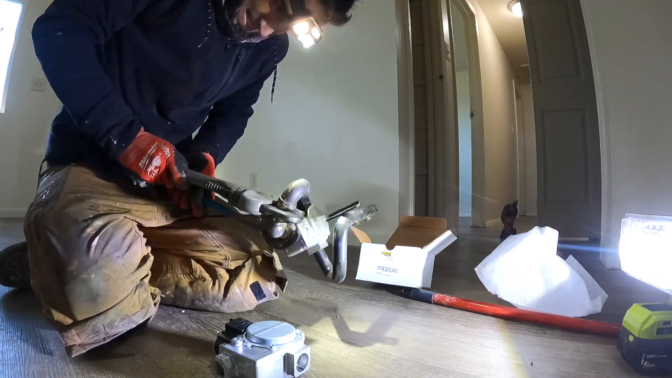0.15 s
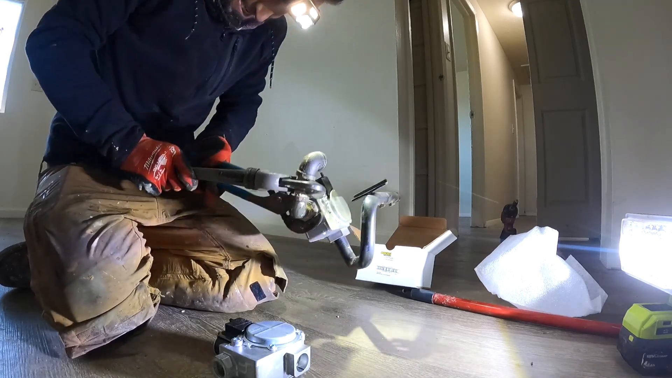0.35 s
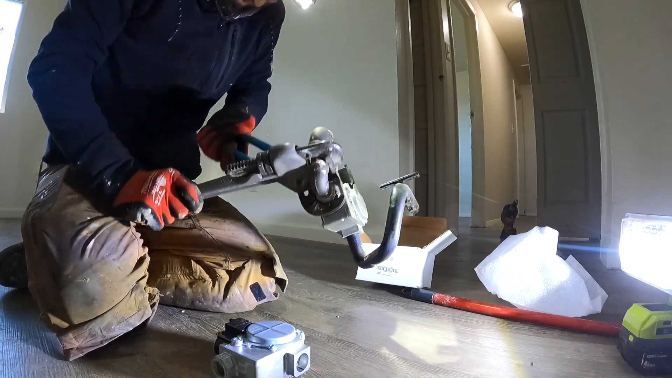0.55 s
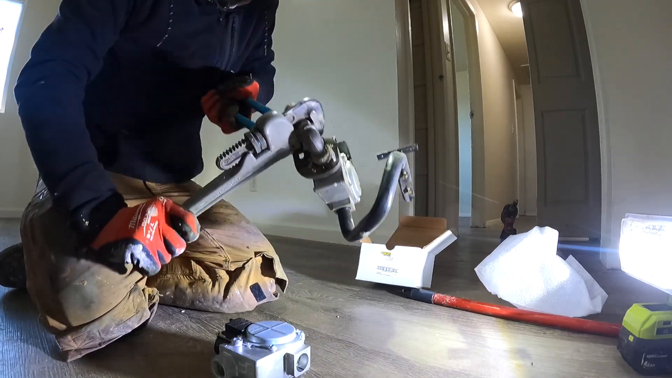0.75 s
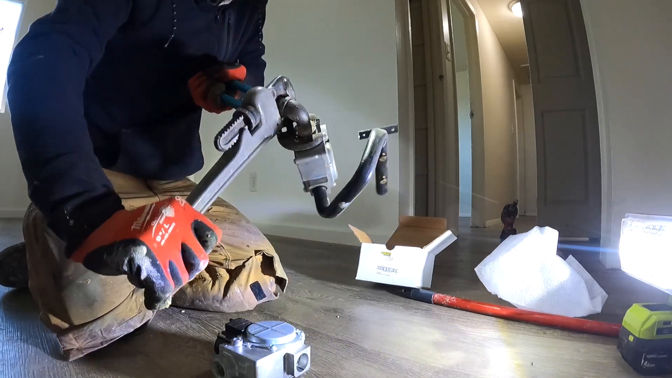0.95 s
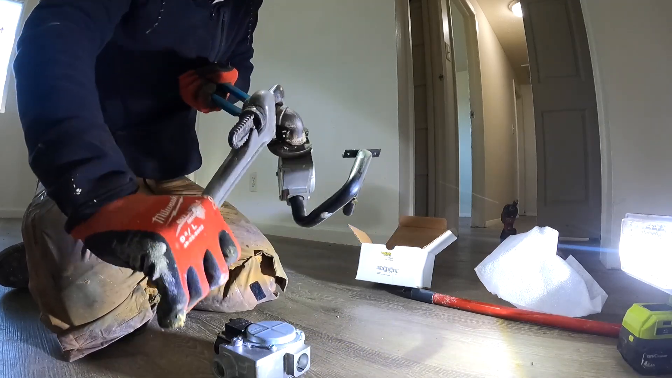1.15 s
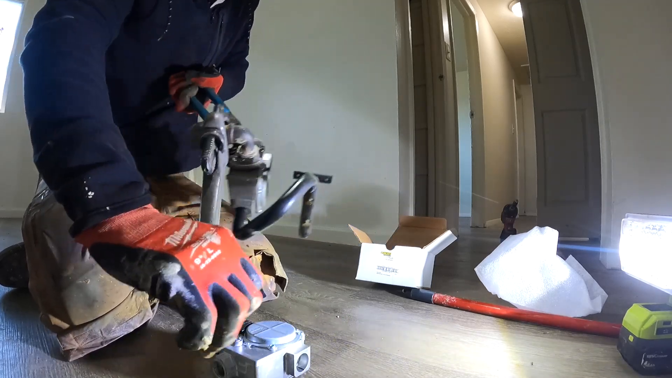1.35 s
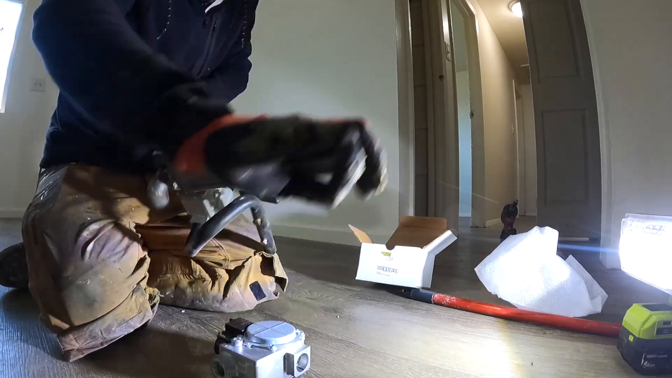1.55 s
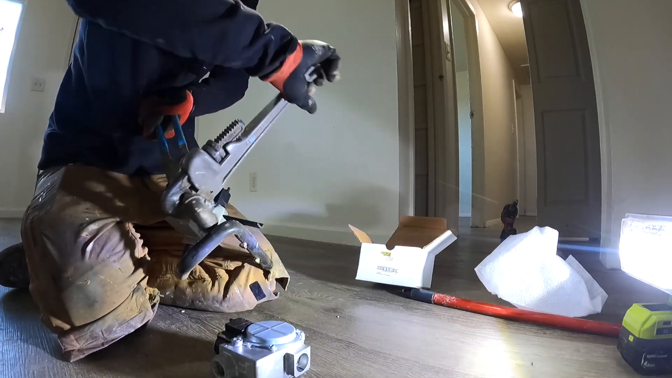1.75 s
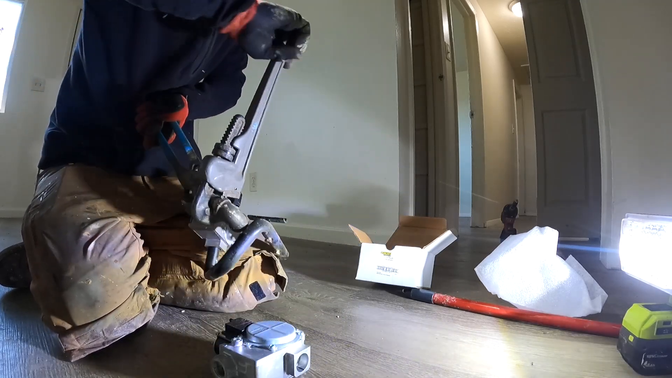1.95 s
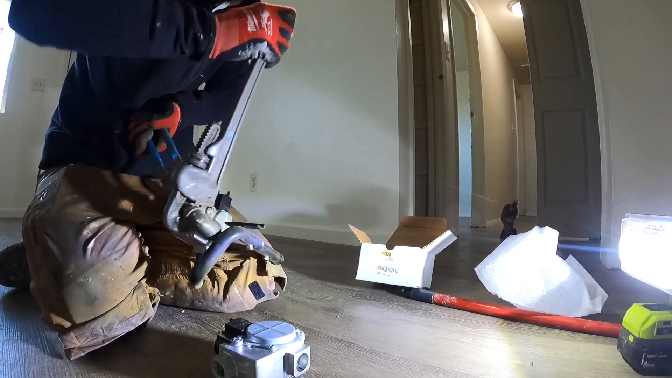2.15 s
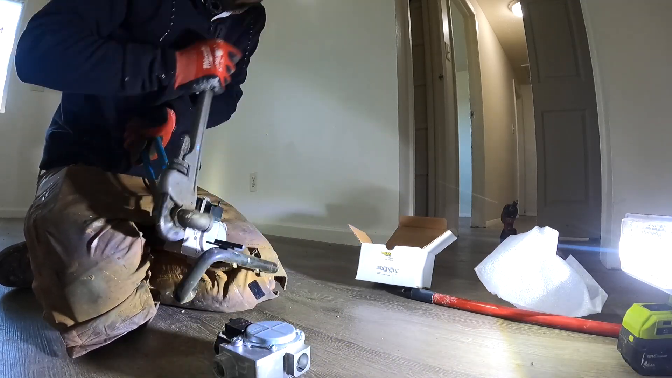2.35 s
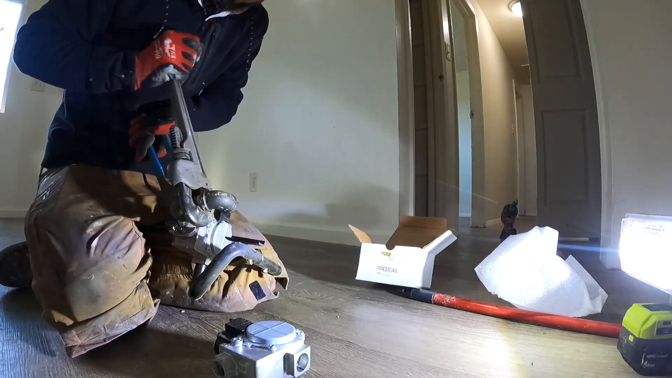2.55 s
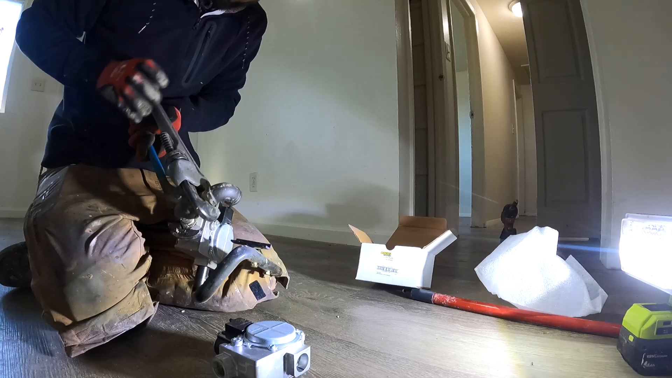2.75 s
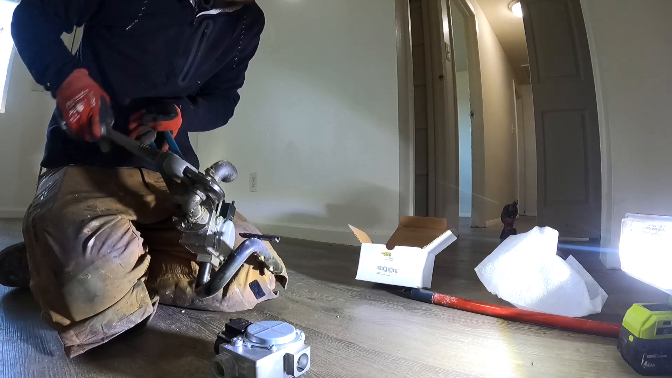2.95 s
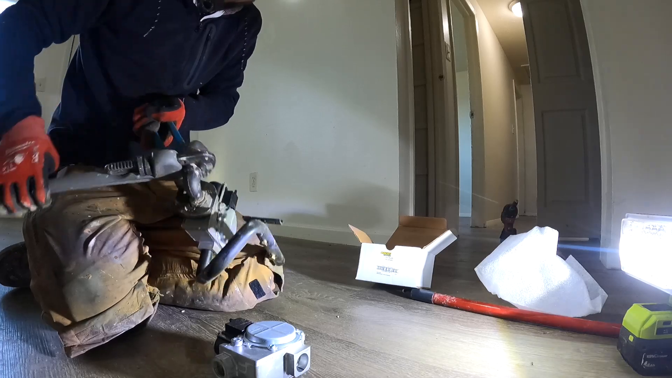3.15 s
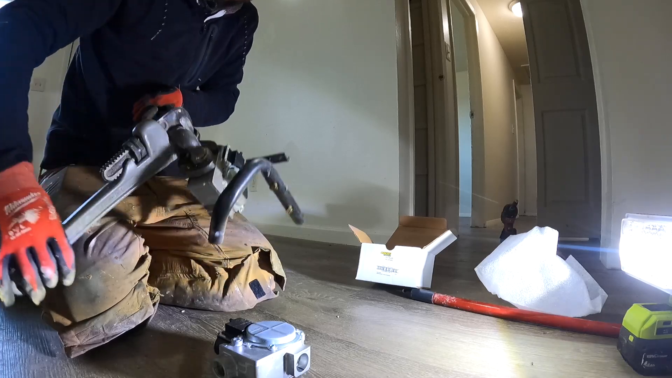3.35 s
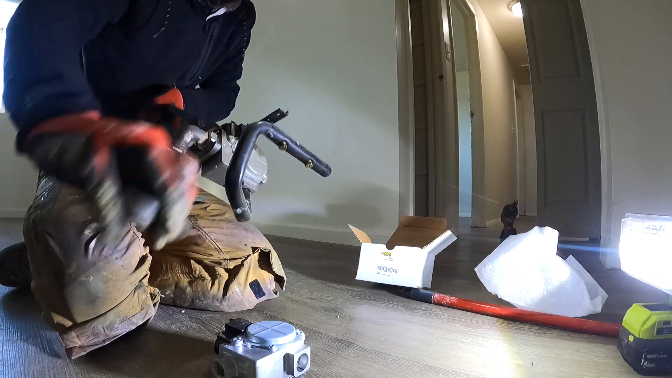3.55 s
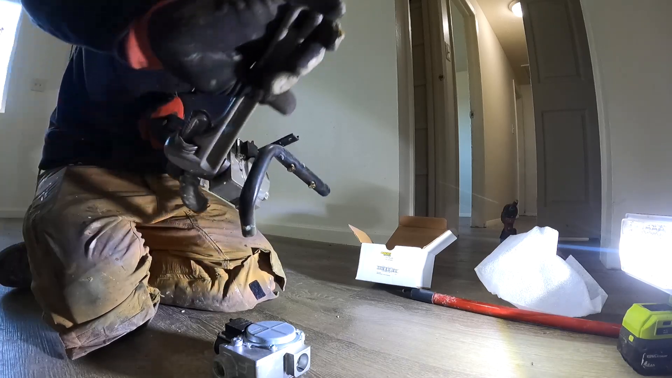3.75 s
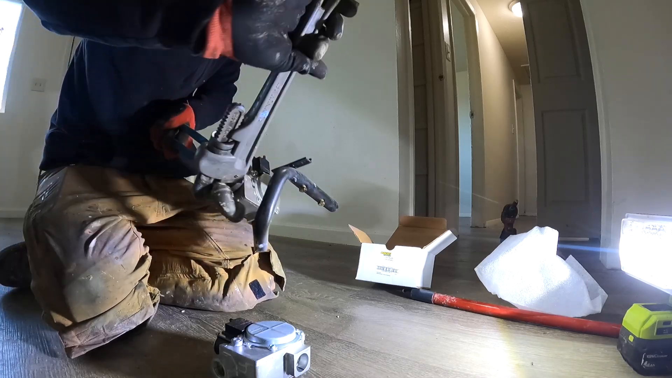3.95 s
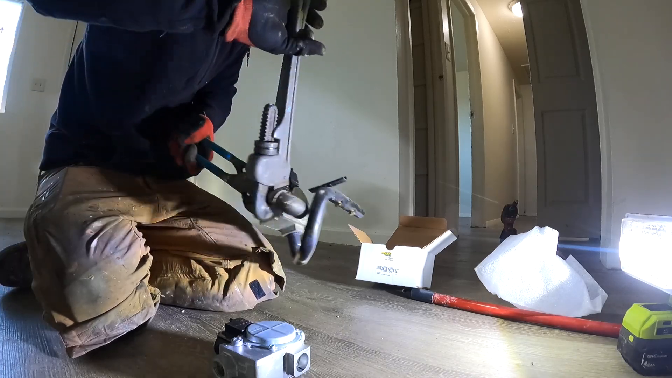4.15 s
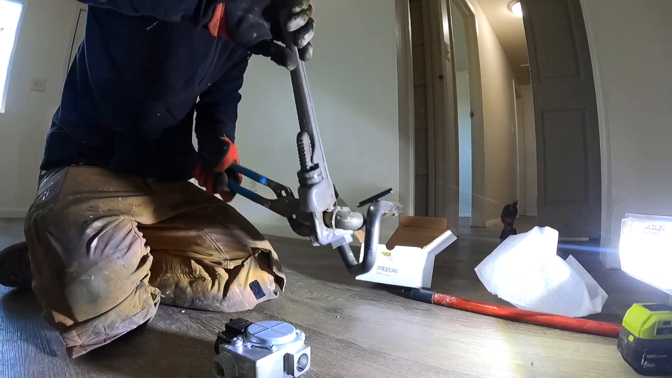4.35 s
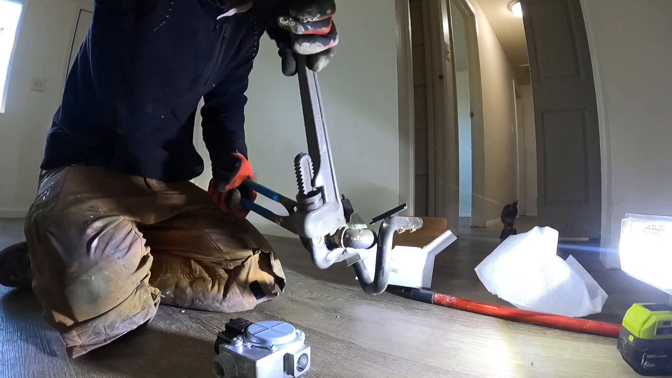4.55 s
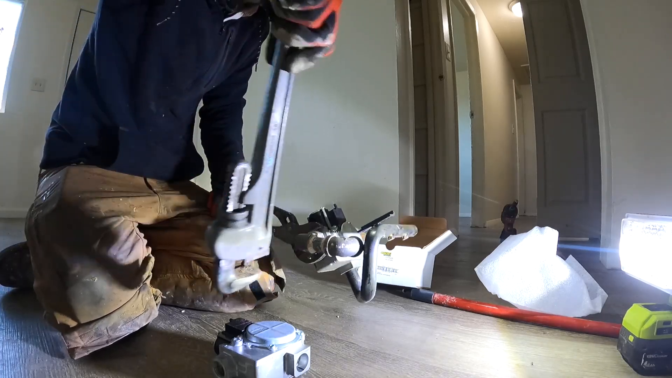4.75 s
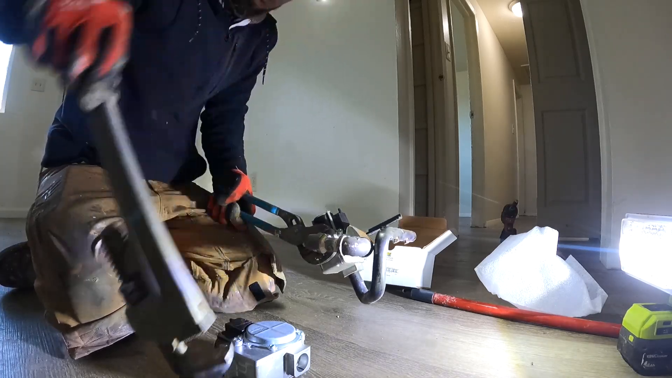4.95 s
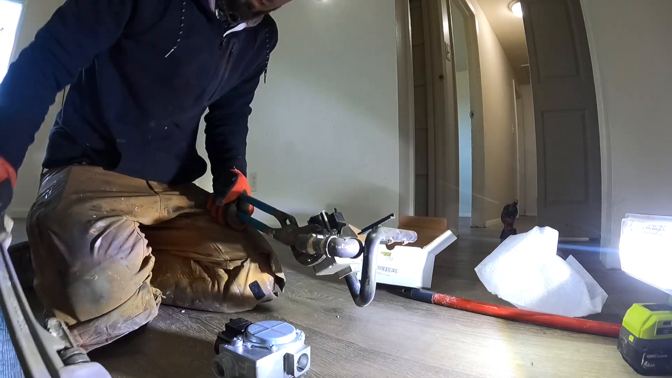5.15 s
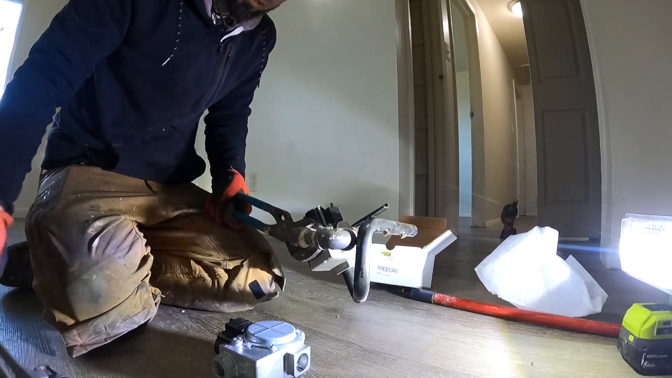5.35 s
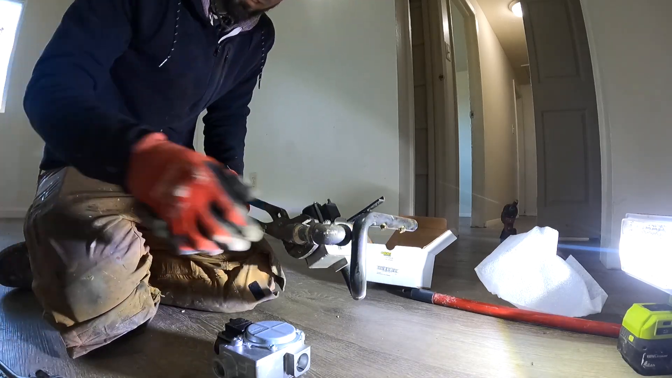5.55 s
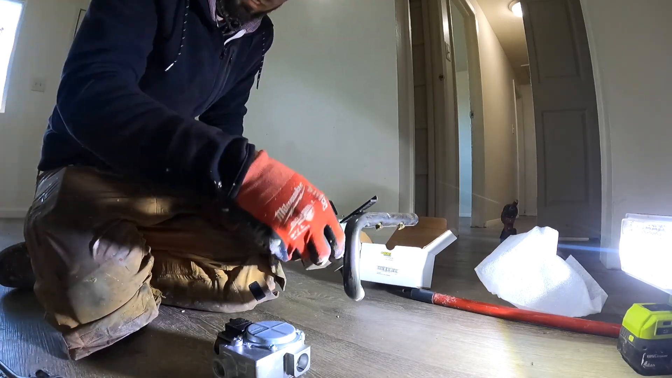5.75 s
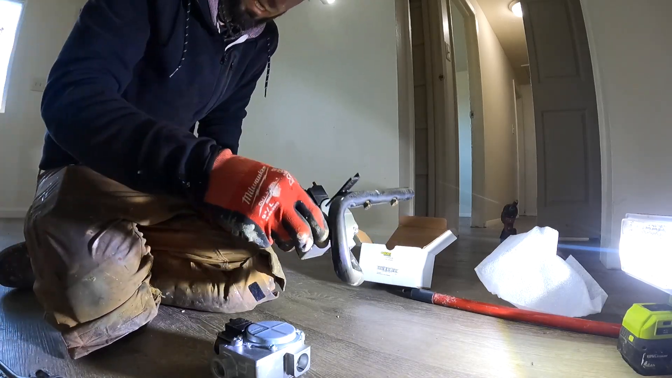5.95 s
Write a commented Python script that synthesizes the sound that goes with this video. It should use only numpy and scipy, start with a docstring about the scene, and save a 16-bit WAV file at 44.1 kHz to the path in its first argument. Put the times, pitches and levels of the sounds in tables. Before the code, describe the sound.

A pipe wrench clacks and scrapes on steel fittings amid rustling clothes, then drops onto a wooden floor with a ringing clatter.

```python
"""A pipe wrench works steel fittings off a gas valve in a bare room with a wooden floor.
Its loose jaw clacks and bounces at each bite, and slipping threads knock the hollow fittings.
Steel scrapes on steel, knees and boots shift and work clothes rustle over the room's faint hum.
Then the wrench is dropped: it thumps the boards, topples, clatters and rings out."""
import sys
import numpy as np
from scipy import signal
from scipy.fft import rfft, irfft
from scipy.io import wavfile

SR = 44100
rng = np.random.default_rng(int(sys.argv[2]) if len(sys.argv) > 2 else 0)


def transcribe(signal):
    """Save signal, clipped to [-1, 1], as a 16-bit WAV file at the path in sys.argv[1]."""
    frames = np.atleast_2d(signal).T
    limited = np.clip(frames, -1, 1)
    pcm = np.round(limited * 32767).astype(np.int16)
    wavfile.write(sys.argv[1], SR, pcm)


N = 265041
TIME = np.arange(N) / SR
HIT_GAIN = np.sqrt(SR / 200)   # a hit's level counts its energy as if spread over 5 ms
TYPICAL_HZ, TYPICAL_DB = 2180, -36.5   # a middling contact of the jaw
OFF_DB = -np.inf

# The modes of the wrench's steel. Each row: pitch in Hz, level in dB, free-ringing t60 in seconds.
WRENCH_MODES = [(818, 0, .6), (910, -1, .4), (968, -4, .3), (1000, -8, .15), (1038, -4, .15),
                (1103, -2, .35), (1165, -9, .3), (1254, -2, .45), (1365, -3, .4), (1570, -2, .45),
                (1745, -6, .4), (1880, -5, .4), (2222, -4, .5), (2275, 0, .6), (2369, -6, .4),
                (2575, -3, .6), (2736, -3, .7), (2780, -5, .45), (2890, -4, .6), (2929, -4, .6),
                (3300, -6, .45), (3420, -8, .5), (3575, -10, .6), (3858, -5, .45), (4250, -19, .25),
                (4335, -3, .3), (4347, -5, .3), (4393, -13, .25), (4690, -9, .4), (4715, -11, .45),
                (5080, -10, .25), (5290, -11, .25), (5495, -1, .45), (5610, -3, .2), (6176, 4, .6),
                (6220, 0, .4), (8289, -2, .2), (10690, -12, .12), (10900, -15, .08), (13250, -21, .15),
                (13610, -25, .3)]


def jaw_bites():
    """The loose jaw bites the fitting: a knock and two dying rebounds, as a list of contacts."""
    # Each row: start in seconds, level in dB, knock pitch in Hz, first rebound in dB against the bite,
    # ring in dB, ring centre in Hz.
    bites = [(1.017, -30, 2730, -5, -18, 2950), (1.0229, -30.5, 840, -3.5, -23, 850),
             (1.7951, -37.5, 4000, -7, 0, 1026), (1.811, -35, 3680, -29, -18, 940),
             (1.8432, -29.5, 4560, -34, -11.5, 1070), (3.372, -36.5, 1870, 5, 0, 1636),
             (3.4488, -22.5, 2230, -12.5, -21, 2140), (3.601, -23, 3340, -5, -4, 4460),
             (3.611, -25, 2020, -16, -11, 1420), (3.669, -18.5, 3320, -11, -4, 4335),
             (3.678, -26.5, 4600, -5, -5.5, 6300), (3.6835, -27, 5500, -20, 4, 13900),
             (3.7072, -31.5, 2600, -4, 8.5, 4500), (3.74, -23.5, 2350, -4.5, -8, 3860),
             (3.758, -26, 2450, -17, -4, 2900), (3.7708, -33.5, 2270, -0.5, -1.5, 2840),
             (3.984, -39, 1470, -14, -18, 840), (4.7055, -38.5, 2230, -3, -7.5, 854),
             (4.733, -33.5, 1800, -13.5, -8, 1880), (4.9167, -24.5, 2130, -25, -13, 5530),
             (4.926, -37, 2650, -36, -9.5, 8300)]
    rebound_s, rebound_loss_db, chatter_t60 = 0.0065, 2, 0.034
    contacts = []
    for start, db, hz, rebound_db, ring_db, ring_hz in bites:
        times = start + rebound_s * np.cumsum([0, *rng.uniform(0.85, 1.15, 2)])
        levels = db + np.array([0, rebound_db, rebound_db - rebound_loss_db])
        for at, level in zip(times, levels):
            contacts.append((at, level, hz, *contact_tone(db, hz), chatter_t60, ring_db, ring_hz, OFF_DB))
    return contacts


def tooth_ticks():
    """The teeth touch too lightly to bounce or ring: crisp contacts with little body."""
    # Each row: start in seconds, level in dB, pitch in Hz.
    ticks = [(2.173, -43, 2760), (2.359, -44, 2370), (3.06, -47, 4800), (3.254, -44.5, 4400),
             (3.3317, -42.5, 4500), (3.351, -39, 4670), (3.917, -39, 3550), (4.3928, -34, 7300),
             (4.883, -42, 1640), (5.044, -41, 2100)]
    body_db, chatter_t60 = -49, 0.009
    return [(start, db, hz, body_db, contact_tone(db, hz)[1], chatter_t60, OFF_DB, hz, OFF_DB)
            for start, db, hz in ticks]


def contact_tone(db, hz):
    """Body and treble of a jaw contact, in dB: small, light contacts are the crispest."""
    octaves, harder_db = np.log2(hz / TYPICAL_HZ), db - TYPICAL_DB
    body_db = -13 - 0.5 * octaves - 0.25 * harder_db
    treble_db = -24.5 + 13.3 * octaves - 0.64 * harder_db
    return body_db, treble_db


def wrench_landings():
    """The dropped wrench hits wood: dull contacts that ring the low modes of the steel."""
    # Each row: start in seconds, level in dB, chatter t60 in seconds, ring in dB.
    landings = [ (5.2536, -43, 0.028, 9.5), (5.2657, -13.5, .007, -26), (5.4799, -22.5, 0.035, 3),
                (5.512, -24, 0.093, -4), (5.5338, -22, 0.01, -3.5), (5.5379, -22, 0.0078, -16),
                (5.5492, -22, 0.0056, -18), (5.5696, -17.5, 0.012, -32), (5.6222, -19.5, 0.0043, -15),
                (5.637, -33.5, 0.026, -11)]
    knock_hz, body_db, treble_db, ring_hz = 1106, -6.5, -27, 990
    return [(start, db, knock_hz, body_db, treble_db, t60, ring_db, ring_hz, OFF_DB)
            for start, db, t60, ring_db in landings]


def jaw_slaps():
    """As the wrench tumbles, its jaw slaps the shank: bright contacts that ring the high modes."""
    # Each row: start in seconds, level in dB, knock pitch in Hz, chatter t60 in seconds, ring in dB,
    # ring centre in Hz, shimmer of the top modes in dB.
    slaps = [(5.2649, -26, 4800, 0.018, -22, 4330, -40), (5.273, -16.5, 4320, 0.026, 2, 4400, -40),
             (5.275, -32, 5000, 0.011, 2.5, 5900, -25), (5.4901, -20.5, 4200, 0.055, 3, 5370, -4),
             (5.512, -22.5, 2720, 0.046, -8, 2570, -16), (5.523, -20.5, 3800, 0.013, -9, 5200, -22),
             (5.5263, -21.5, 3300, 0.032, -25, 2820, -16), (5.5315, -22, 4170, 0.026, -17, 5400, -15),
             (5.558, -38, 5740, 0.019, 10, 6200, -8), (5.5684, -19, 7630, 0.0024, -16, 6200, -34),
             (5.578, -43, 3900, 0.0054, 1, 6200, -4), (5.5922, -35, 3650, 0.0074, 19, 4470, 4),
             (5.6353, -31, 1740, 0.024, 10, 2435, -18), (5.6628, -28.5, 7300, .003, 15.5, 4500, -34)]
    body_db, treble_db = -12.5, -13.5
    return [(start, db, hz, body_db, treble_db, t60, ring_db, ring_hz, shimmer_db)
            for start, db, hz, t60, ring_db, ring_hz, shimmer_db in slaps]


def steel_knocks(contacts, width, chatter, steel_db):
    """Each contact is a sharp push and chatter between the faces, partly heard through the steel."""
    out, t = np.zeros(N), TIME[:4096]
    for start, db, hz, body_db, treble_db, t60, *_ in contacts:
        force = chatter * unit(rng.standard_normal(len(t)) * decay(t, t60))
        force[0] += 1
        # small, hard contacts are higher in pitch and carry less midrange
        clack = band(force, hz / (1 + width), hz * (1 + width), order=1)
        clack = band(clack, max(750, hz / 2.8), max(min(6400, hz * 2.6), hz * 1.15), order=3)
        crack = band(band(force, 6500, 12000, order=3), 2000, 7500, order=1)
        steel = pinched_steel(t, t60 * 0.11)
        clack, crack = (unit(unit(x) + from_db(steel_db) * unit(signal.fftconvolve(x, steel)[:len(t)]))
                        for x in (clack, crack))
        body = unit(band(force, 64, 1290))
        knock = unit(clack + from_db(body_db) * body + from_db(treble_db) * crack)
        add(out, start, from_db(db) * HIT_GAIN * knock)
    return out


def pinched_steel(t, t60):
    """While the faces still press together, the steel's modes are choked within milliseconds."""
    hz, db, _ = np.transpose(WRENCH_MODES)
    gains = from_db(db + rng.normal(0, 1.0, len(hz)))
    return gains @ np.cos(2 * np.pi * hz[:, None] * t) * decay(t, t60)


def steel_ring(contacts, tail_db, t60_scale, ping_db, ping_t60, reach_octaves, spill_db, spill_tilt_db,
               rattle):
    """Contacts feed the modes near their ring centre: a ping, soon damped by touching parts, and a tail."""
    hz, mode_db, free_t60 = np.transpose(WRENCH_MODES)
    out, feed = np.zeros(N), np.zeros((len(hz), N))
    # every mode is stirred a little; the tilt is per octave
    spill = from_db(spill_db + spill_tilt_db * np.log2(hz / TYPICAL_HZ))
    top_modes = hz > 8000
    for start, db, *_, ring_db, ring_hz, shimmer_db in contacts:
        near = spill + nearness(hz, ring_hz, reach_octaves)
        share = near * from_db(ring_db) + top_modes * from_db(shimmer_db)
        feed[:, int(start * SR)] += (from_db(db + mode_db) * HIT_GAIN * share) ** 2
    jangle_below_hz, jangles_per_s = 1760, 50
    for mode_hz, t60, energy in zip(hz, free_t60 * t60_scale, feed):
        ping = from_db(ping_db) ** 2 * radiated(energy, ping_t60)
        tail = from_db(tail_db) ** 2 * radiated(energy, t60)
        # the loose jaw shifts on the shank: low modes jangle in level and phase, high ones stay pure
        jangle = rattle / np.sqrt(1 + (mode_hz / jangle_below_hz) ** 6)
        phase = 2 * np.pi * mode_hz * TIME
        tone = (1 + jangle * drift(jangles_per_s)) * np.sin(phase)
        tone += jangle * drift(jangles_per_s) * np.cos(phase)
        out += np.sqrt(ping + tail) * tone
    return out


def radiated(energy, t60):
    """A mode stores the energy of the blows and gives off a constant share per sample."""
    loss = 1 - from_db(-120 / (t60 * SR))
    return signal.lfilter([loss], [1, loss - 1], energy + 1e-18)


def hollow_fittings(t60, tail_db, tail_t60, reach_octaves):
    """The elbow and valve answer each slip with the modes near its pitch; the holding hand damps them."""
    # Slips of thread or jaw. Each row: start in seconds, level in dB, centre pitch in Hz.
    slips = [(1.0159, -29.5, 2900), (1.0177, -28, 1620), (1.0219, -26.5, 1680), (1.0307, -51, 1100),
             (1.312, -43, 1770), (1.313, -44, 3280), (1.364, -47, 2880), (1.385, -48.5, 1870),
             (1.7965, -32.5, 1900), (3.611, -20.5, 2230), (4.706, -34.5, 2100), (4.733, -37.5, 1960),
             (4.9176, -28.5, 2640)]
    # The fittings' modes. Each row: pitch in Hz, level in dB.
    modes = [(919, -3), (1113, -4), (1337, -3), (1572, 1), (1756, 1), (1800, 1), (1890, -1), (2090, -3),
             (2202, -1), (2290, 0), (2410, -5), (2616, -3), (2730, -4), (2821, -3), (2925, -4), (3140, -4),
             (3320, -4)]
    out, t = np.zeros(N), TIME[:SR // 2]
    hz, mode_db = np.transpose(modes)
    fade = decay(t, t60) + from_db(tail_db) * decay(t, tail_t60)
    for start, db, centre_hz in slips:
        gains = nearness(hz, centre_hz, reach_octaves) * from_db(mode_db + rng.normal(0, 3.5, len(hz)))
        tone = gains @ np.sin(2 * np.pi * hz[:, None] * t)
        add(out, start, from_db(db) * HIT_GAIN * unit(tone * fade))
    return out


def floorboards(attack_s):
    """The sprung floor booms under the wrench's weight."""
    # Each row: start in seconds, level in dB.
    thumps = [(5.263, -30), (5.281, -23), (5.493, -25.5), (5.55, -22), (5.572, -28)]
    # The boards' modes. Each row: pitch in Hz, level in dB, t60 in seconds.
    modes = [(116.53, 2, 0.65), (132.4, -8.5, 0.39), (146, -10.5, 0.21), (193, -38, 0.3),
             (297.7, -12, 0.19)]
    out, t = np.zeros(N), TIME[:SR]
    boom = sum(from_db(db) * decay(t, t60) * np.sin(2 * np.pi * hz * t) for hz, db, t60 in modes)
    boom *= 1 - np.exp(-t / attack_s)
    for start, db in thumps:
        add(out, start, from_db(db) * boom)
    return out


def steel_scrapes(bunching_db):
    """Rough steel sticks and lets go on steel, so its tiny slips come in uneven bunches."""
    # Each row: midpoint in seconds, length in seconds, level in dB, centre pitch in Hz.
    strokes = [(.505, 0.018, -52.5, 2900), (1.317, 0.023, -50.5, 1940), (1.93, 0.063, -50.5, 1730),
               (2.295, 0.24, -47.5, 2800), (2.455, 0.027, -44.5, 2030), (2.53, 0.043, -42, 3130),
               (2.95, 0.34, -59, 1500), (3.4, 0.043, -43, 1600), (3.58, 0.064, -41, 1810),
               (4.485, 0.02, -48, 3430), (4.8, 0.2, -55, 2190)]
    slips = grains(per_s=6800, spread_db=2.0) * from_db(bunching_db * drift(170))
    return friction(strokes, slips, width=1.0)


def floor_scuffs():
    """Knees and boots shift on the floor with a low, soft rub."""
    # Each row: midpoint in seconds, length in seconds, level in dB, centre pitch in Hz.
    strokes = [(.2, 0.13, -58, 460), (0.846, 0.0082, -45, 318), (1.031, 0.027, -46, 235),
               (1.853, 0.12, -54, 286), (2.46, 0.04, -50.5, 290), (2.555, 0.047, -49, 323),
               (3.2, 0.82, -64, 342), (3.727, 0.097, -53, 282)]
    return friction(strokes, grains(per_s=2400, spread_db=-4.0), width=0.25)


def friction(strokes, slips, width):
    """Each stroke swells and fades: dense slips through a broad resonance."""
    out = np.zeros(N)
    for middle, length, db, hz in strokes:
        rub = band(slips, hz / (1 + width), hz * (1 + width), order=1)
        rub = unit_rms(band(rub, hz / 3, hz * 2))
        swell = np.exp(-2 * ((TIME - middle) / length) ** 2)
        out += from_db(db) * rub * swell
    return out


def work_clothes(gain_db, flutter_db):
    """Fibres of sleeves and gloves catch and let go; each arm movement swells, holds and dies away."""
    # Each row: start in seconds, length in seconds, level in dB.
    arm_moves = [(-.05, 0.35, -54), (0.737, 0.2, -45.5), (1.648, 0.4, -55.5), (2.164, 0.17, -52.5),
                 (2.409, 0.22, -53.5), (2.667, 0.53, -59), (3.189, 0.285, -53), (3.72, 0.23, -61),
                 (4.261, 0.61, -67.5), (5.306, 0.45, -44.5)]
    # The rustle's spectrum. Each row: frequency in Hz, relative density in dB.
    spectrum = [(290, -2), (500, -10.5), (811, -9.5), (1090, -6), (1170, -5.5), (2170, 0), (2880, -0.5),
                (3140, 0), (5460, 1), (12100, -16), (15000, -24)]
    attack_s, release_s, resting_db = 0.025, 0.023, -70
    fibres = coloured(grains(per_s=14000, spread_db=1.5), spectrum)
    power = from_db(resting_db) ** 2
    for start, length, db in arm_moves:
        attack = 1 - np.exp(-np.maximum(TIME - start, 0) / attack_s)
        release = np.exp(-np.maximum(TIME - start - length, 0) / release_s)
        power += (from_db(db) * attack * release) ** 2
    return fibres * np.sqrt(power) * from_db(gain_db + flutter_db * drift(60))


def room_tone(level_db, side_db):
    """Low hum and faint hiss of the still room, in stereo."""
    # Each row: frequency in Hz, relative density in dB.
    spectrum = [(12, -9), (20, -13), (38, 6.5), (70, -12), (155, 2), (199, -9), (603, -22), (656, -34.5),
                (1420, -17.5), (3180, -35.5), (4430, -22.5), (5240, -35), (6180, -24.5), (12000, -47.5),
                (15000, -58)]
    mid, side = (coloured(rng.standard_normal(N), spectrum) for _ in range(2))
    return from_db(level_db) * stereo(mid, side, side_db)


def room_response(build_s):
    """Reflections off the bare walls build up quickly and die away band by band."""
    # Each row: frequency in Hz, t60 in seconds, level in dB, side against mid in dB.
    reverb = [(100, 0.22, 4, -31), (297, 0.95, -1, -7), (590, 1.33, -0.5, -10.5), (1100, 0.93, -1.5, -8.5),
              (1750, 1.27, -2.5, -8), (2690, 1.33, -4.5, 1), (4900, 0.94, -5.5, -21.5),
              (8060, 0.71, -9.5, -4.5), (13900, 0.26, -14, 8)]
    t, out = TIME[:SR], 0
    edges = 60 * 2 ** np.arange(0, 8.5, 2 / 3)
    white = rng.standard_normal((2, 2, SR))   # neighbouring bands take different noise
    for k, (low, high) in enumerate(zip(edges, edges[1:])):
        t60, db, side_db = (at_hz(reverb, np.sqrt(low * high), column) for column in (1, 2, 3))
        fade = unit(decay(t, t60) * (1 - np.exp(-t / build_s)))
        mid, side = band(white[k % 2], low, high) * fade * from_db(db)
        out += stereo(mid, side, side_db)
    return out


def placed(x, room, pan_db, wet_db):
    """A source with its reflections; a positive pan leans left."""
    echoes = signal.fftconvolve(x[None], room, axes=1)[:, :N]
    return (x + from_db(wet_db) * echoes) * from_db(np.array([[pan_db], [-pan_db]]) / 2)


def stereo(mid, side, side_db):
    """Mid and side to left and right."""
    return mid + from_db(side_db) * side * np.array([[1], [-1]])


def grains(per_s, spread_db):
    """Tiny slips of uneven size at random moments; rms 1."""
    sizes = rng.standard_normal(N) * from_db(spread_db * np.minimum(rng.exponential(1, N), 4))
    return unit_rms(sizes * (rng.random(N) < per_s / SR))


def drift(per_s):
    """A random wander with a spread of about one."""
    return np.interp(TIME * per_s, np.arange(2000), rng.standard_normal(2000))


def coloured(x, spectrum):
    """Give a noise its spectrum; rms 1."""
    gains = from_db(at_hz(spectrum, np.fft.rfftfreq(N, 1 / SR)))
    return unit_rms(irfft(rfft(x) * gains, N))


def band(x, low_hz, high_hz, order=2):
    """Causal band-pass."""
    sos = signal.butter(order, [low_hz, min(high_hz, 0.45 * SR)], "band", fs=SR, output="sos")
    return signal.sosfilt(sos, x)


def at_hz(points, hz, column=1):
    """Read a column of a table on a log-frequency axis."""
    points = np.array(points)
    return np.interp(np.log(hz + 1e-3), np.log(points[:, 0]), points[:, column])


def nearness(hz, centre_hz, reach_octaves):
    """A bell curve around a pitch."""
    return np.exp(-(np.log2(hz / centre_hz) / reach_octaves) ** 2)


def add(track, start, sound):
    """Mix a sound in at a time in seconds."""
    at = int(np.clip(start * SR, 0, N - 1))
    track[at:at + len(sound)] += sound[:N - at]


def decay(t, t60):
    """Fall by 60 dB every t60 seconds."""
    return from_db(-60 * t / t60)


def from_db(db):
    """Decibels to gain."""
    return 10 ** (np.asarray(db) / 20)


def unit(x):
    """Scale to an energy of one."""
    return x / np.sqrt(np.sum(x ** 2) + 1e-20)


def unit_rms(x):
    """Scale to an rms of one."""
    return unit(x) * np.sqrt(len(x))


def scene():
    """Hand work, then the drop, all in one room."""
    room = room_response(build_s=0.0012)
    gripping, falling = jaw_bites() + tooth_ticks(), wrench_landings() + jaw_slaps()
    jaw = steel_knocks(gripping, width=0.52, chatter=3.0, steel_db=-6)
    # the grip shortens the ring; once dropped, the steel rings freely
    jaw_ring = steel_ring(gripping, tail_db=-14, t60_scale=0.2, ping_db=4, ping_t60=0.038,
                          reach_octaves=0.055, spill_db=-25, spill_tilt_db=1, rattle=0.69)
    drop = steel_knocks(falling, width=0.17, chatter=2.37, steel_db=-9)
    drop_ring = steel_ring(falling, tail_db=-8.5, t60_scale=1.0, ping_db=-5, ping_t60=0.042,
                           reach_octaves=0.12, spill_db=-22, spill_tilt_db=-2.5, rattle=0.88)
    handling = steel_scrapes(bunching_db=3.5) + floor_scuffs() + work_clothes(gain_db=2, flutter_db=2.5)
    fittings = hollow_fittings(t60=0.046, tail_db=-33, tail_t60=0.25, reach_octaves=0.18)
    return (placed(jaw, room, pan_db=2.1, wet_db=-3)
            + placed(jaw_ring, room, pan_db=2, wet_db=1)
            + placed(drop, room, pan_db=3, wet_db=0)
            + placed(drop_ring, room, pan_db=1, wet_db=9.5)
            + placed(fittings, room, pan_db=1, wet_db=-2)
            + placed(floorboards(attack_s=0.0017), room, pan_db=-6, wet_db=-6)
            + placed(handling, room, pan_db=1.6, wet_db=-1.5)
            + room_tone(level_db=-53.5, side_db=-16.5))


def record(dry):
    """The highest treble softens above 13 kHz and is cut off near 16 kHz."""
    soften_hz, cutoff_hz = 13200, 15700
    softened = signal.sosfilt(signal.butter(10, soften_hz, fs=SR, output="sos"), dry)
    return signal.sosfilt(signal.ellip(10, 0.1, 80, cutoff_hz, fs=SR, output="sos"), softened)


dry = scene()
out = record(dry)
transcribe(out)
```